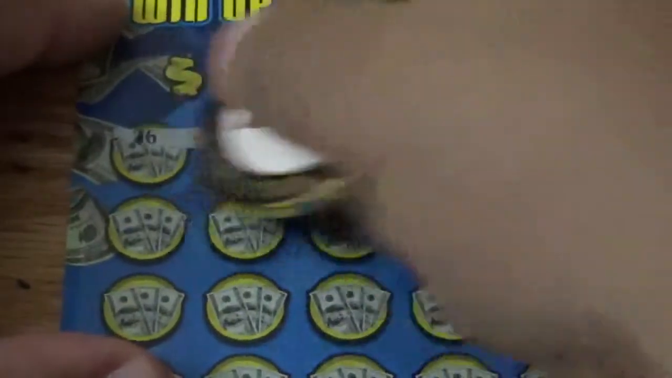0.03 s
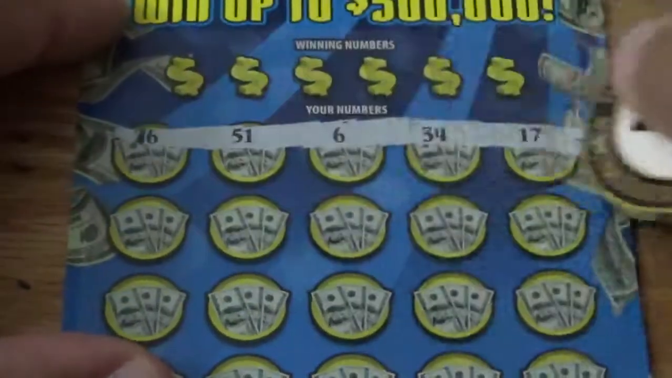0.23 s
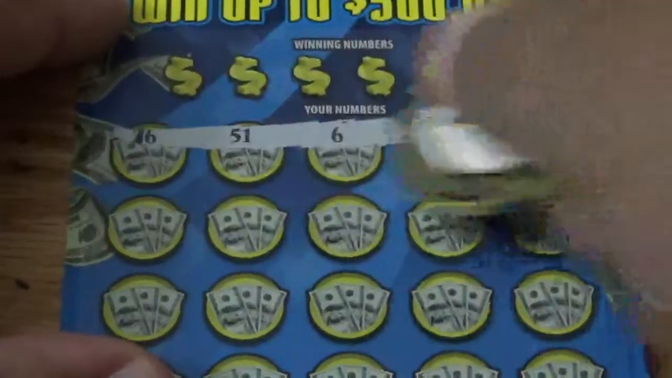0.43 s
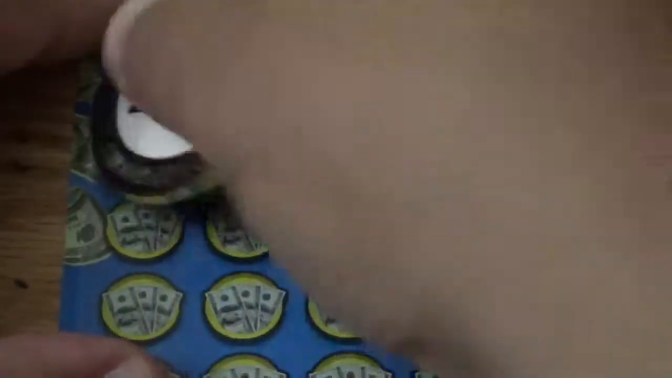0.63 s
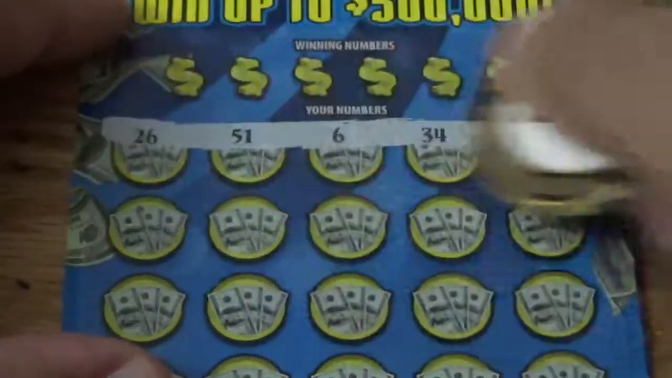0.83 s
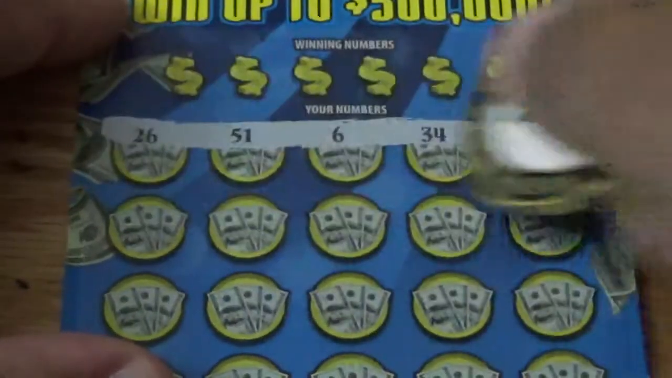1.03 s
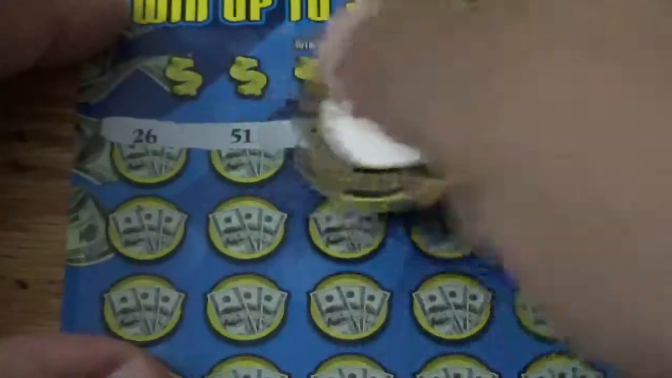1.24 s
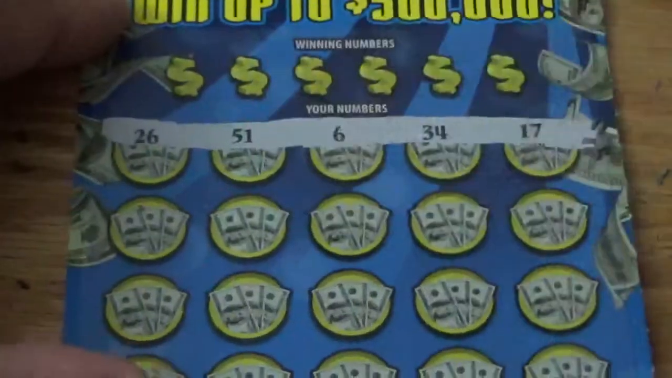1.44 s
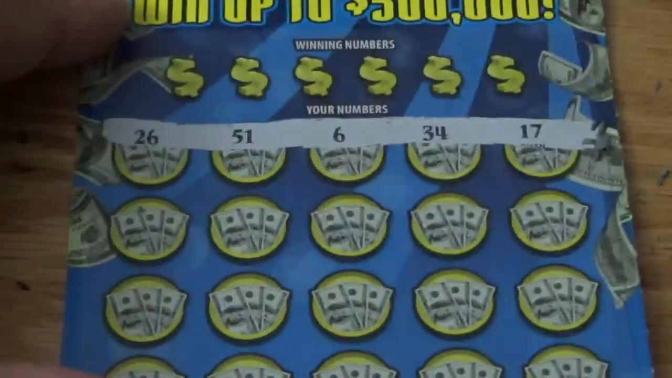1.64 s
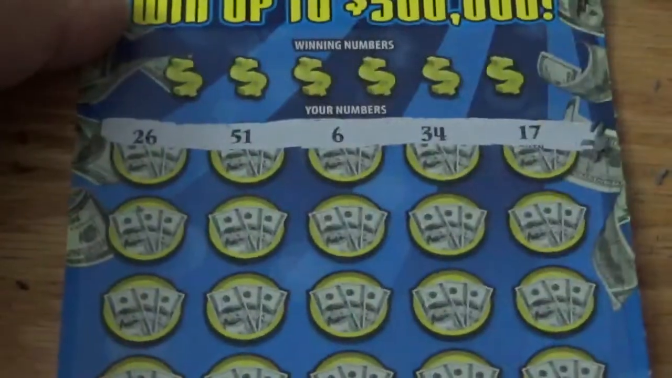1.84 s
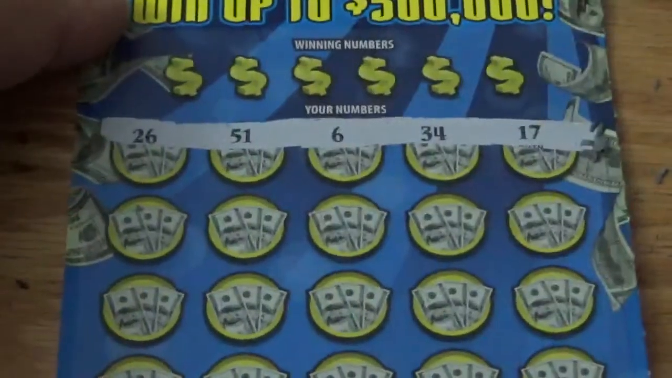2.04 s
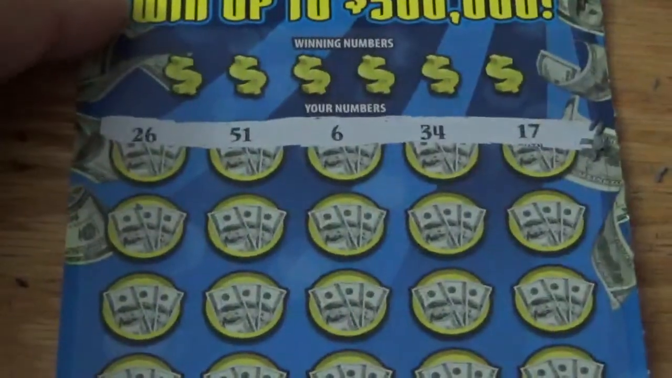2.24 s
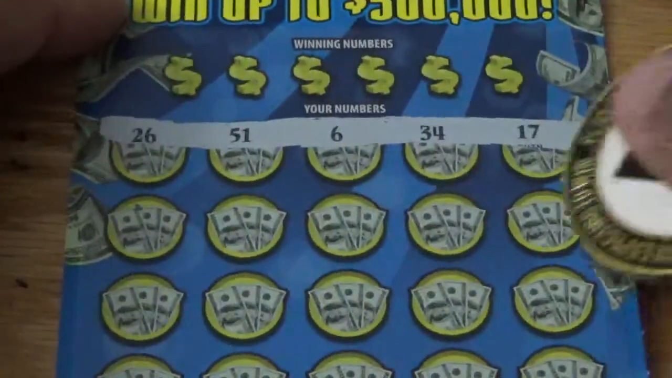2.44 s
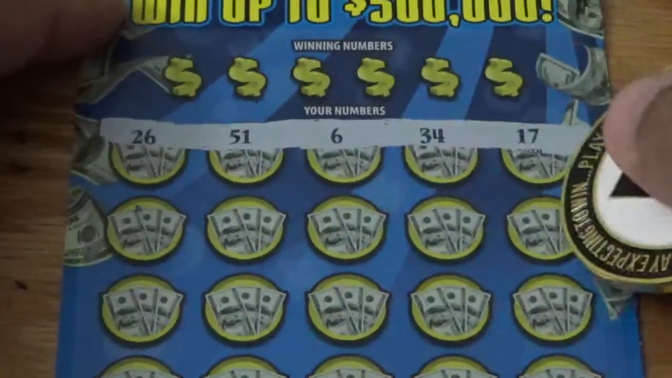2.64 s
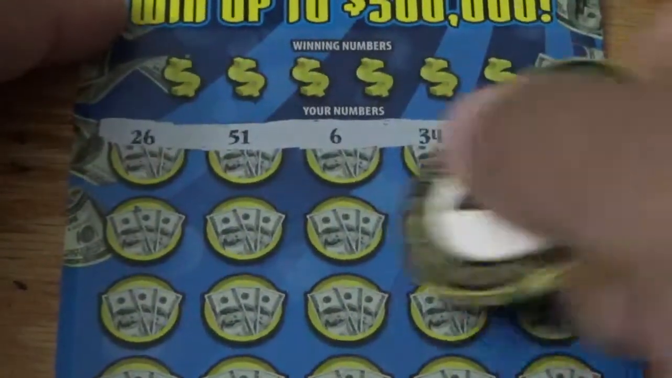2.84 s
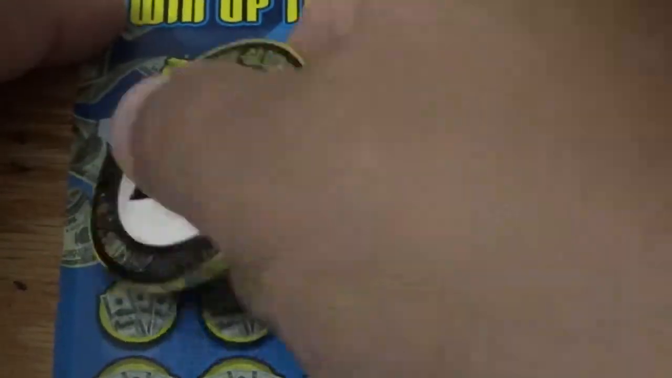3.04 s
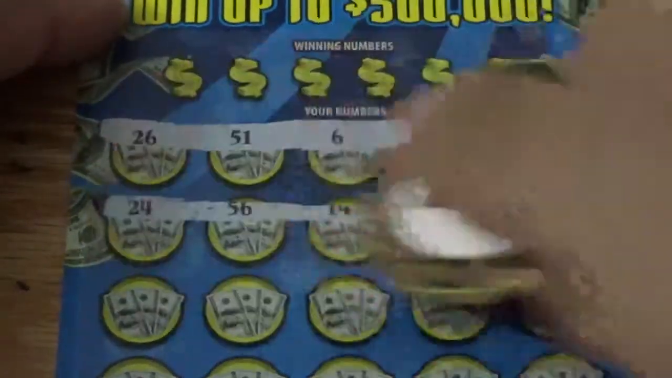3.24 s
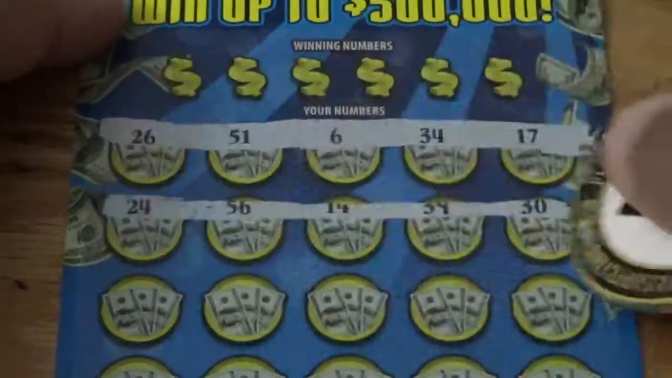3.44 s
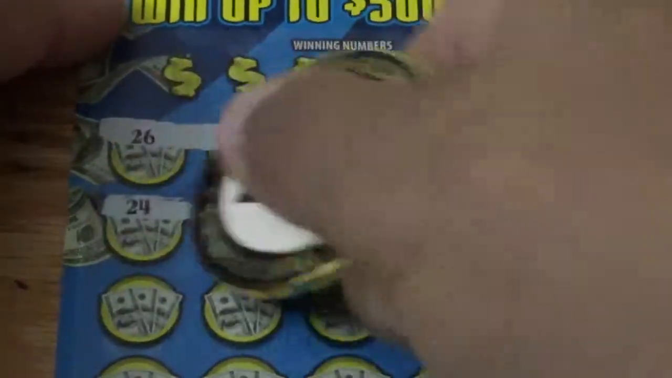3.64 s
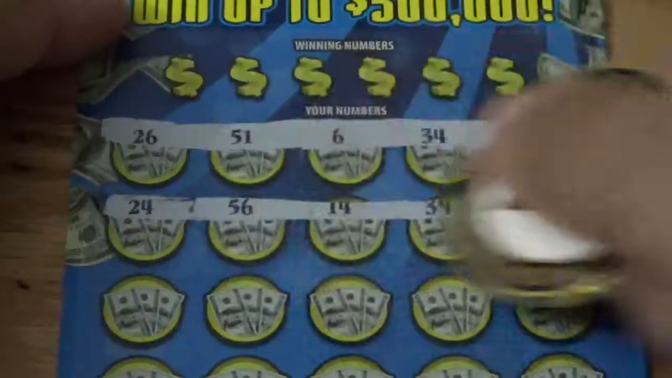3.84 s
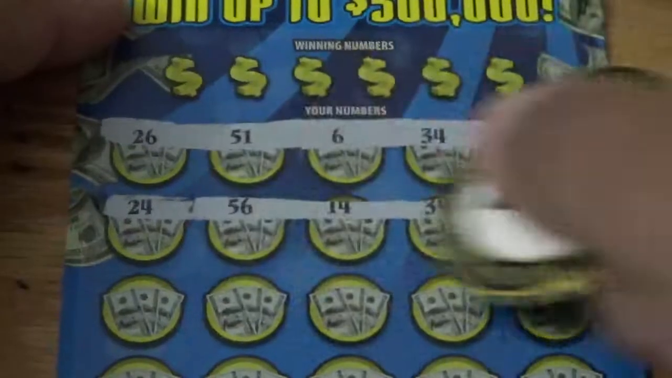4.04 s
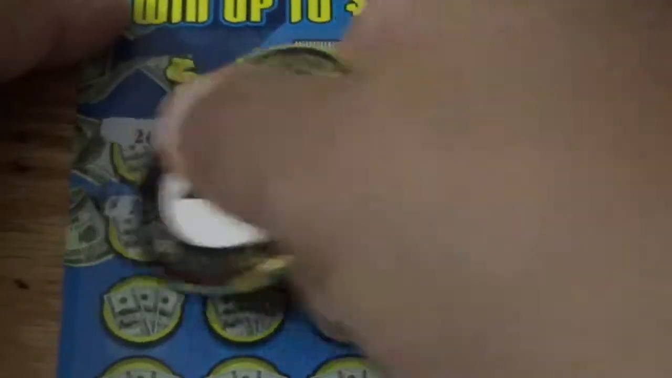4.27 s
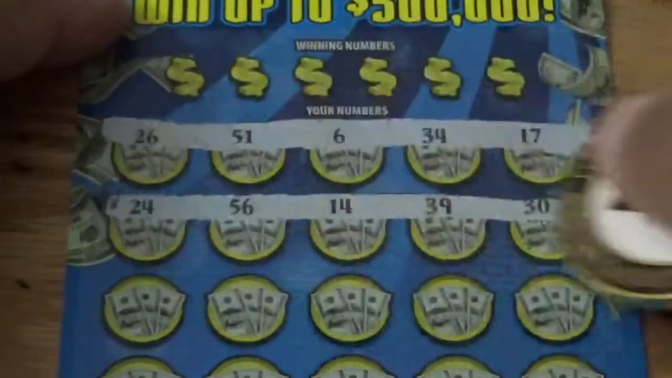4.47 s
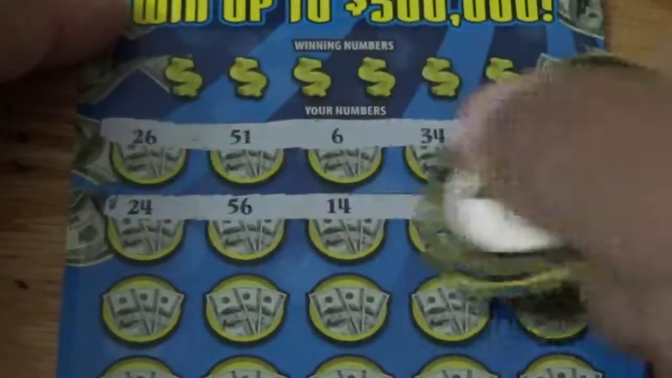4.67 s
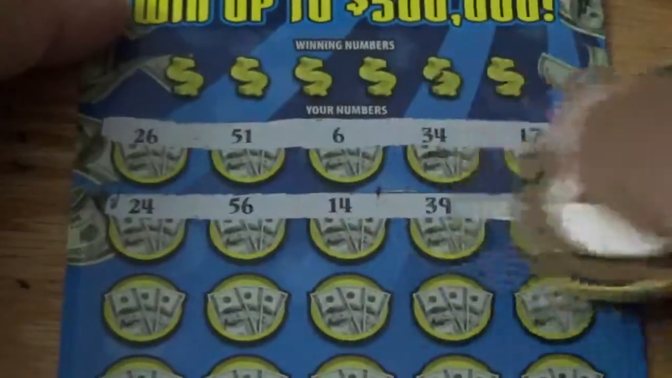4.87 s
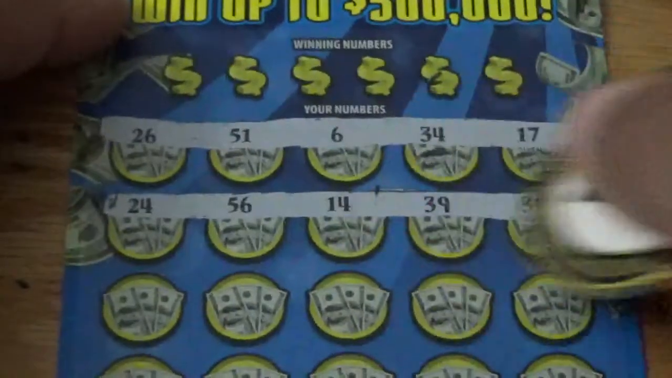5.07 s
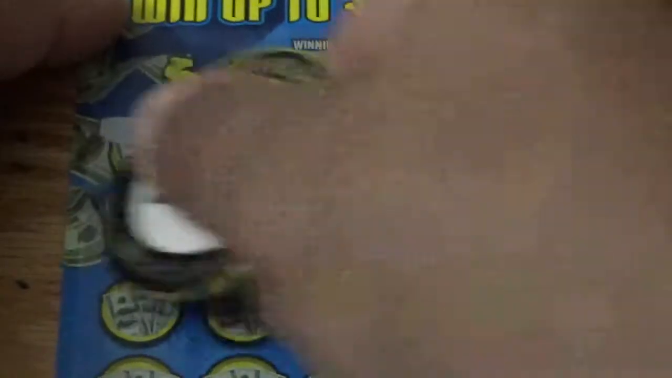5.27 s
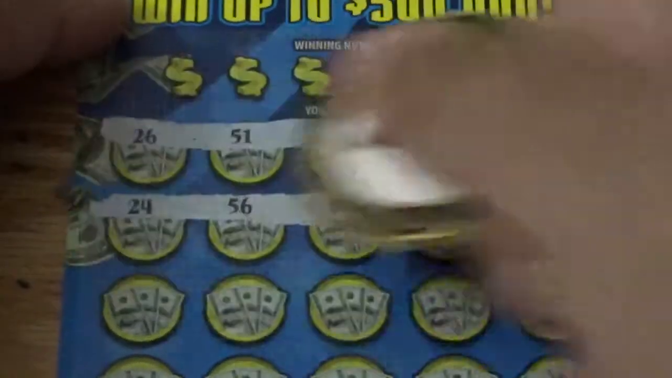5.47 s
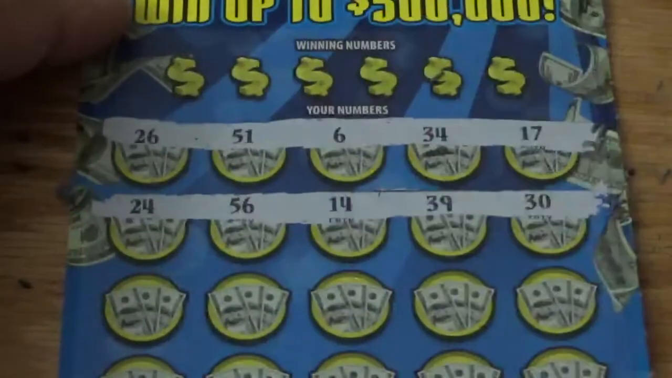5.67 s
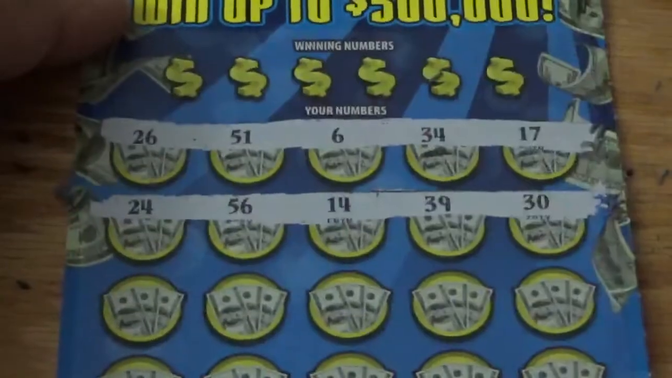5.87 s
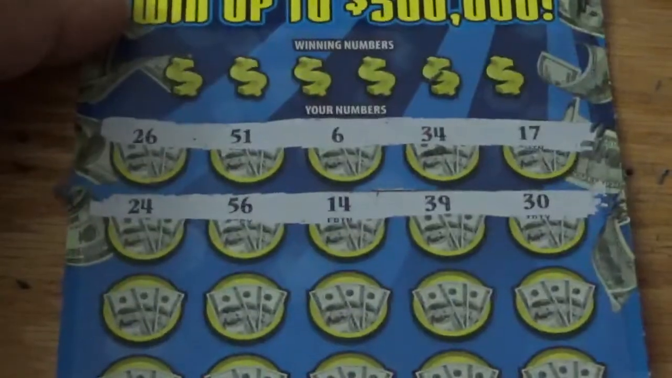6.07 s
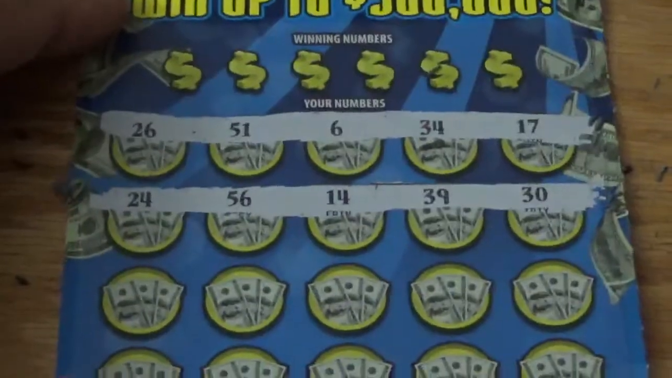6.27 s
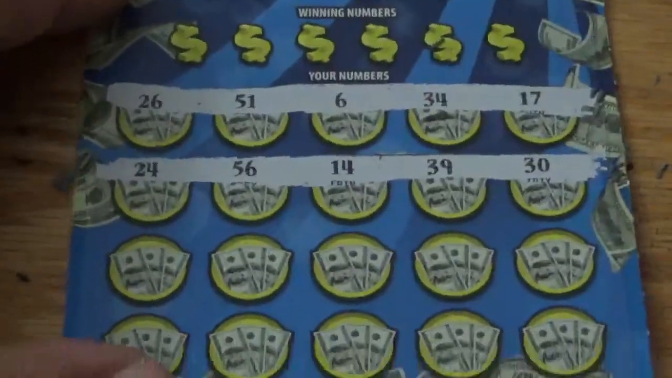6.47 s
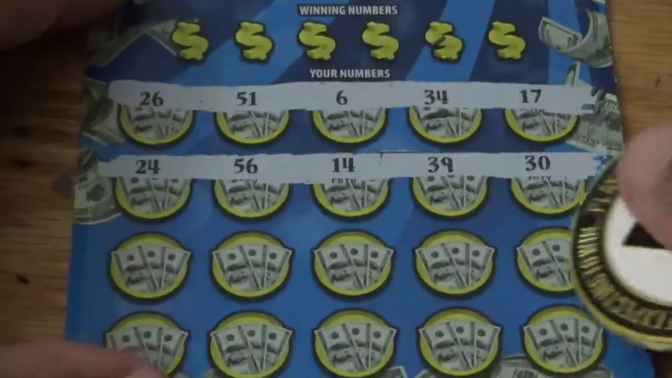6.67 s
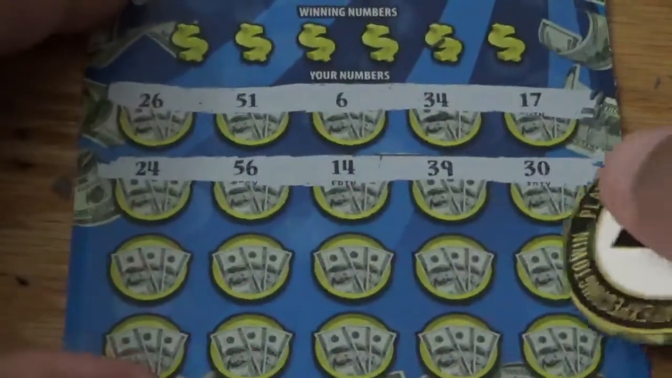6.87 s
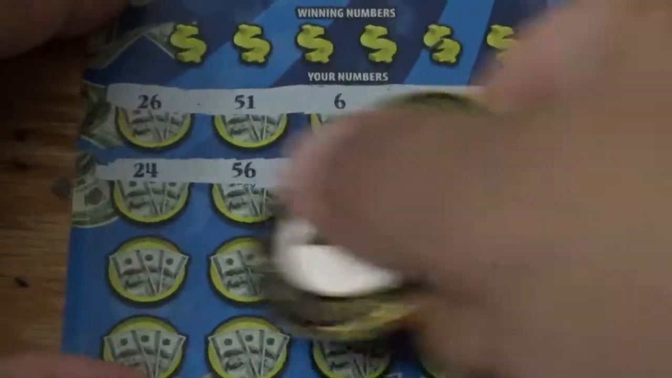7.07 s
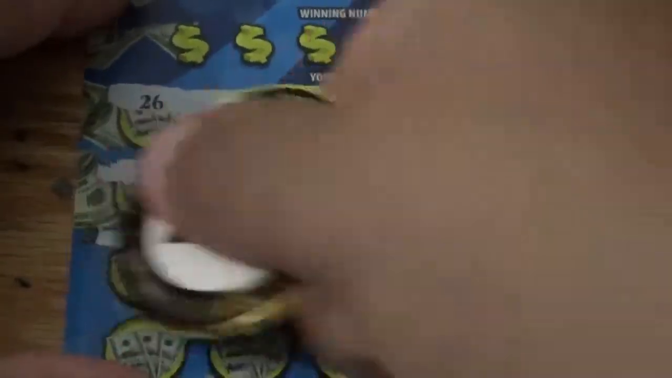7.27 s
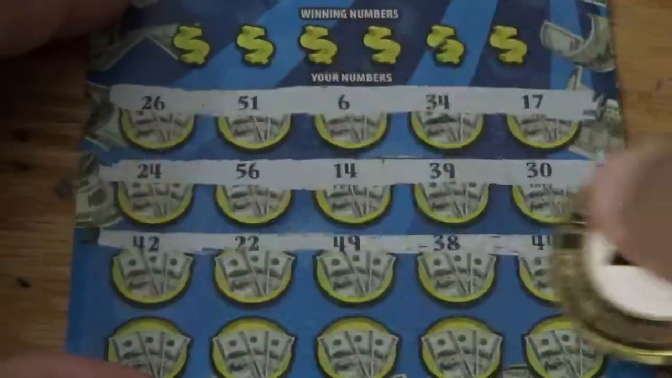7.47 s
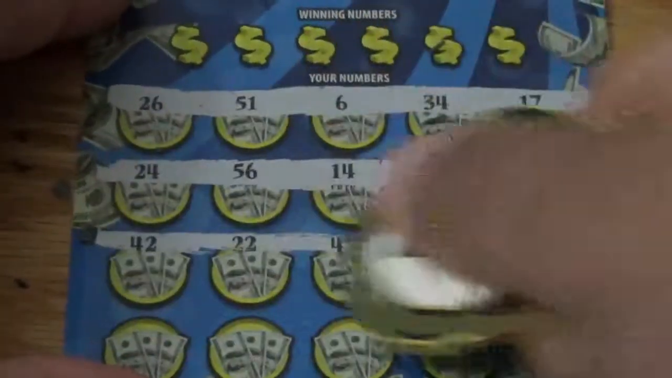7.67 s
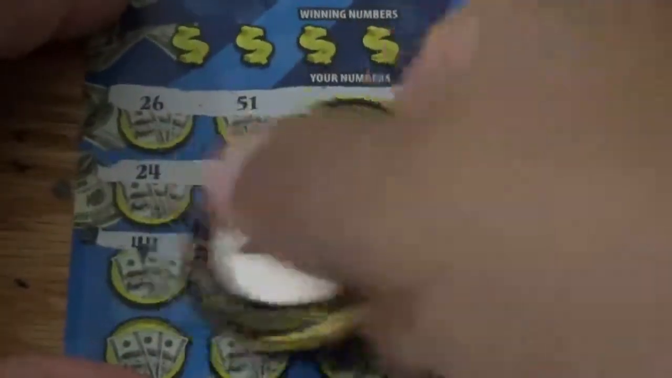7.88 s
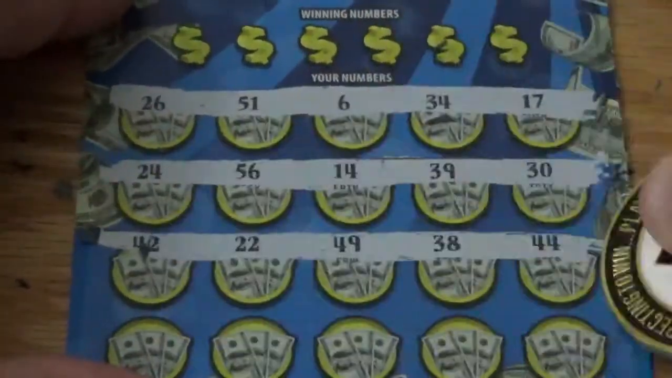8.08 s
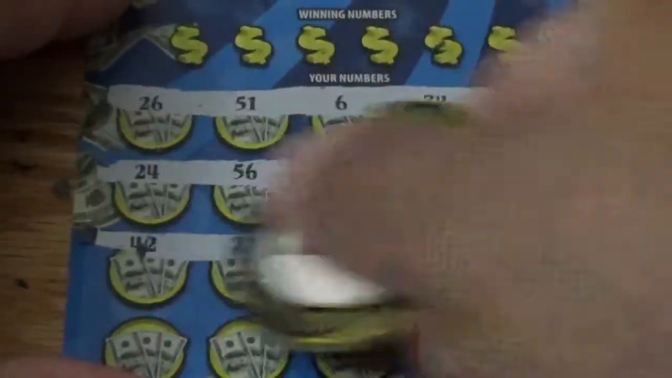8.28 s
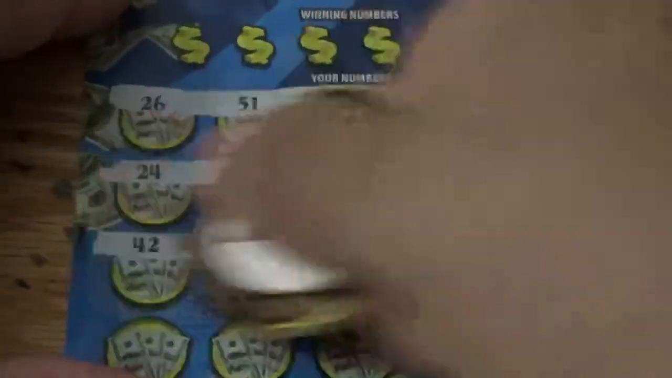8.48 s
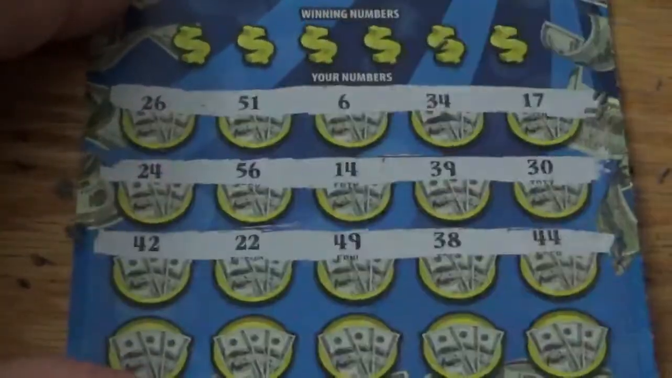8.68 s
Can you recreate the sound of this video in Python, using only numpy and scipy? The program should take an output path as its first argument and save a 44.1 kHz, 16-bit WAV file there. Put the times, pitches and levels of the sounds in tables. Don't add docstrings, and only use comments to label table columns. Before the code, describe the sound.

A thick coin scrapes a card ticket on a wooden table in fast back-and-forth strokes, with pauses of soft palm brushing and small ticks.

```python
import sys
import numpy as np
from scipy import signal
from scipy.fft import rfft, irfft, next_fast_len
from scipy.io import wavfile
from scipy.ndimage import uniform_filter1d

SR = 44100
rng = np.random.default_rng(int(sys.argv[2]) if len(sys.argv) > 2 else 0)


def generate_wav(sig):
    pcm = np.round(np.clip(np.atleast_2d(sig).T, -1, 1) * 32767).astype(np.int16)
    wavfile.write(sys.argv[1], SR, pcm)


def undo_db(level):
    steps = np.asarray(level, float) / 20
    return 10 ** steps


N = 384111


def unit(x):
    return x / np.sqrt(np.mean(x ** 2) + 1e-20)


def along(points, hz):
    f, v = np.transpose(points)
    return np.interp(np.log(hz + 1), np.log(f + 1), v)


def wobble(rate):
    knots = rng.standard_normal(int(N * rate / SR) + 2)
    return np.interp(np.arange(N) * rate / SR, np.arange(len(knots)), knots)


def bumps(rows, t):
    return sum(np.outer(db, np.exp(-((t - s) / half) ** 2)) for s, half, *db in rows)


def filtered(x, response):
    m = next_fast_len(N + SR // 2)
    return irfft(rfft(x, m) * response(np.fft.rfftfreq(m, 1 / SR)), m)[..., :N]


def shape(points):
    return lambda hz: undo_db(along(points, hz))


def modes(peaks, flip=True):
    def response(hz):
        total = 0
        for k, (centre, width, db) in enumerate(peaks):
            sign = -1 if flip and k % 2 else 1
            damping = 1j * hz * width
            total = total + sign * undo_db(db) * damping / (centre * centre - hz * hz + damping)
        return total
    return response


def above(hz, edge_hz):
    s = 1j * hz / edge_hz
    return s * s / (s * s + 1.23 * s + 1)


def driven(force, gain, response, tilt_db=None, split_hz=None):
    def body(hz):
        r = np.interp(hz, hz[::16], response(hz[::16]))
        return r / np.sqrt(np.mean(np.abs(r) ** 2))

    def halves(hz):
        lower = 1 / (1 + (hz / split_hz) ** 12)
        return body(hz) * [lower, 1 - lower]

    if tilt_db is None:
        return filtered(force * gain, body)
    return filtered(force * gain * undo_db([-tilt_db / 2, tilt_db / 2]), halves).sum(0)


def slips(spread_db, clump_db, clump_rate):
    largest = 4
    uneven_db = spread_db * np.minimum(rng.exponential(size=N), largest)
    size = undo_db(uneven_db + clump_db * np.clip(wobble(clump_rate), -2, 2))
    return unit(np.tanh(unit(size * rng.standard_normal(N)) / largest))


def patchy(x, depth_db, hz_bins, frames):
    z = signal.stft(x, nperseg=512)[2]
    field = uniform_filter1d(rng.standard_normal(z.shape), hz_bins, 0)
    field = uniform_filter1d(field, frames, 1)
    return unit(signal.istft(z * undo_db(depth_db * unit(field)), nperseg=512)[1][:N])


# (frequency [Hz], level [dB per Hz])
AIR = [(20, -34), (40, -5), (110, -7), (190, 0), (320, -2), (570, -7.5), (920, -8), (2100, -11),
       (4000, -16), (6500, -19.5), (8000, -19.5), (10500, -19.5), (11300, -25)]
# (frequency [Hz], left-right likeness [0-1])
AIR_ALIKE = [(60, 1), (340, 0.67), (820, 0.059), (2000, 0.24), (4700, 0.51), (11300, 0.73)]


def air():
    def mid_side(hz):
        turn = np.arccos(np.clip(along(AIR_ALIKE, hz), -1, 1)) / 2
        return shape(AIR)(hz) * [np.cos(turn), np.sin(turn)]

    mid, side = filtered(rng.standard_normal((2, N)), mid_side)
    return undo_db(-56 + wobble(2.45)) * unit(np.array([mid + side, mid - side]))


# (time [s], half-length [s], level [dB])
SHAKES = [(.3, .06, 5), (.6, 0.17, 4.5), (1.0, 0.083, 7), (1.7, 0.067, 6), (2.2, 0.44, -7),
          (6.5, 0.47, -10), (3.95, .15, 1), (4.9, 0.09, 4), (8.05, .08, 4), (3.3, 0.044, -4),
          (3.72, .07, 4), (4.2, .05, 0), (4.65, 0.062, 6), (5.09, .06, 11), (5.5, .06, 2), (7.5, 0.12, 7),
          (8.3, 0.21, 6), (8.6, 0.2, 5)]
# (frequency [Hz], level [dB per Hz])
SHAKE = [(20, -20), (40, -4), (80, -2.5), (150, -0.5), (230, -20), (400, -70)]
# (time [s], half-length [s], level [dB], pitch [Hz])
WHINE = [(2.1, .3, -68, 7950), (6.0, .22, -74, 7950), (2.32, 0.15, -61, 4680), (1.44, .03, -52, 4700),
         (5.46, .035, -42, 6500), (5.2, 0.083, -58, 4700), (6.29, 0.066, -57, 950),
         (2.4, 0.034, -52.5, 370)]


def rumble():
    t = np.arange(N) / SR
    push = rng.standard_normal(N)
    ports = push + np.outer([.25, -.25], push[::-1])
    strength = undo_db(-69.5 + bumps(SHAKES, t[::64])[0]).repeat(64)[:N]
    shake = driven(ports, strength, shape(SHAKE))
    whine = 0
    for s, half, db, hz in WHINE:
        whine = whine + undo_db(db) * np.exp(-((t - s) / half) ** 4) * np.sin(2 * np.pi * hz * t)
    return undo_db(1.5) * shake + whine * wobble(140)


# (frequency [Hz], level [dB])
WET = [(100, -35), (350, -9), (700, 3), (1200, -0.5), (2200, 4), (3000, 5), (6000, 0.5), (10000, 6.5)]
# (frequency [Hz], t60 [s])
ROOM = [(200, 0.068), (1000, 0.23), (3000, 0.23), (6000, 0.17), (10000, 0.058)]


def room(x):
    hz, t, z = signal.stft(rng.standard_normal((2, SR // 3)), SR, nperseg=128)
    decay_db = -60 * t / along(ROOM, hz)[:, None]
    tail = signal.istft(z * undo_db(decay_db + along(WET, hz)[:, None]), SR, nperseg=128)[1]
    return signal.fftconvolve(x[None], tail / np.linalg.norm(tail[0]), axes=1)[:, :N]


# (time [s], rise [s], fade [s], hiss level [dB], rub level [dB], brightness [dB])
PALM = [(1.36, 0.039, 0.34, -43, -61, 5.5), (2.17, 0.09, 0.3, -53, -63, -3),
        (5.389, 0.062, 0.11, -34.5, -75, 7.5), (5.5, 0.042, 0.29, -36, -60.5, 12),
        (6.21, 0.036, 0.15, -61.5, -58, -6), (6.27, 0.099, 0.85, -54, -84, -3),
        (8.58, 0.024, 0.29, -33, -56, 11)]


def slides():
    t = np.arange(0, N, 32) / SR
    start, rise, fade, hiss_db, rub_db, bright_db = np.transpose(PALM)
    ramps = [np.interp(t, [s, s + r, s + r + f], [0, 1, 0]) for s, r, f in zip(start, rise, fade)]
    swell = np.sin(np.pi / 2 * np.array(ramps))
    hiss = undo_db(hiss_db) @ swell ** 2.8
    rub = undo_db(rub_db) @ swell ** 0.71
    bright = (undo_db(hiss_db) * bright_db) @ swell ** 4.5 / (hiss + 1e-9)
    return [np.interp(np.arange(N) / SR, t, curve) for curve in (hiss, rub, bright)]


# (frequency [Hz], level [dB per Hz])
SKIN = [(500, -25), (1500, -11.5), (2500, -14), (4300, -8.5), (4700, -6), (5100, -7.5), (7500, 0.5),
        (9200, -3), (11000, -13)]
# (frequency [Hz], level [dB per Hz])
RUB = [(150, -59), (300, 7), (1000, 2), (2500, -12), (4000, -24)]


def palm():
    hiss, rub, bright_db = slides()
    force = patchy(slips(spread_db=0.8, clump_db=1.0, clump_rate=56), 2.2, hz_bins=10, frames=9)
    fine = driven(force, hiss, shape(SKIN), bright_db, split_hz=9700)
    return fine + undo_db(-1.0) * driven(force[::-1], rub, shape(RUB))


# (time [s], peak level [dB], centre [Hz], scuff share [0-1])
TICKS = [(0.3147, -20, 4940, 0.13), (0.9655, -27, 5500, 0.2), (.989, -27, 7500, .3), (4.6, -29, 9000, .3),
         (4.821, -26, 7500, .5), (2.0134, -49, 7330, 0.13), (2.0502, -42, 7150, 0.33),
         (2.1414, -31.5, 9880, 0.06), (2.177, -24.5, 7940, 0.03), (2.518, -31, 6900, 0.25),
         (2.5491, -43, 5550, 0), (2.5826, -6, 7400, 0.08), (2.681, -32.5, 6000, 0.18),
         (2.7313, -36.5, 9050, 0.19), (3.4247, -29, 5500, 0.4), (4.564, -35, 7000, 0.5),
         (4.89, -24, 9800, 0.2), (3.885, -24, 10000, .2), (3.24, -13, 5600, .8), (3.274, -15, 5600, .9),
         (2.693, -46, 2500, .4), (5.046, -24, 7000, 0.9), (5.056, -2.5, 9000, 0.07),
         (5.056, -18, 3600, 0.3), (2.5824, -31.5, 2810, 0.15), (6.7625, -29, 3000, 0.14),
         (5.068, -17, 9000, 0.3), (5.071, -16, 5500, 0.9), (5.0768, -14.5, 4400, 0.6),
         (5.077, -16, 9000, .6), (5.378, -37, 9300, .2), (6.2292, -39, 6560, 0.2), (6.355, -36, 7250, 0.2),
         (6.356, -42, 1800, .3), (6.764, -18, 6460, 0.07), (6.771, -34, 5800, .6), (6.482, -44, 2500, .2),
         (6.8017, -42, 7900, 0.1), (6.8444, -46, 3700, 0.1), (7.23, -18, 2275, 0.3),
         (7.5227, -11, 10500, 0.08), (8.072, -6.5, 10500, 0.5), (8.0771, -10, 6000, 0.24),
         (8.1764, -17, 5460, 0.4), (8.241, -26, 9500, 0.06), (8.254, -25, 9500, .1), (8.59, -9, 8000, 0.35)]
# (time [s], peak level [dB], centre [Hz], scuff share [ratio])
SKIDS = [(0.353, -25, 5730, 0.9), (1.321, -25, 8250, 0.9), (1.3438, -10, 7800, 0.8),
         (4.506, -19.5, 6100, 0.9), (8.149, -26, 6500, 1.5), (8.163, -25, 6400, 1.5)]


def ticks():
    out, t = np.zeros(N + SR), np.arange(SR // 10) / SR
    card = signal.butter(1, [1600, 3400], "band", fs=SR, output="sos")
    for rows, scuff_t60_s in [(TICKS, 0.019), (SKIDS, 0.059)]:
        for s, db, hz, scuff in rows:
            decay = 0.04 * undo_db(-60 * t / 0.0062) + scuff * undo_db(-60 * t / scuff_t60_s)
            burst = rng.standard_normal(len(t)) * decay
            burst[0] = 1
            colour = signal.butter(2, [hz * 0.55, min(hz * 1.31, 14000)], "band", fs=SR, output="sos")
            burst = signal.sosfilt(colour, burst) + 0.1 * signal.sosfilt(card, burst)
            out[round(s * SR):][:len(t)] += undo_db(db - 6.0) * burst / np.abs(burst).max()
    return out[:N]


# (frequency [Hz], width [Hz], level [dB])
TABLE = [(193.7, 22.3, 4.5), (316.9, 8.8, 5), (341, 35, -1.5), (429.6, 30, -6.5), (495.2, 24, -2.5),
         (580.4, 17.7, 1), (635.7, 22, -1.5), (724, 35, -1)]


def top(hz):
    return modes(TABLE, flip=False)(hz) * above(hz, 302.4) ** 3 / (1 + 1j * hz / 900)


# (time [s], peak level [dB], hardness [Hz])
KNOCKS = [(0.23, -17, 470), (0.29, -2.5, 225), (0.33, -7, 260), (0.99, -14, 350), (2.395, -38, 220),
          (4.59, -19, 340), (9.4, -17, 340), (8.585, -10.5, 330), (4.527, -18, 320), (5.057, -8, 350),
          (5.121, -25, 540), (6.352, -17, 225), (1.994, -24, 270), (6.813, -13, 420), (6.811, -28.5, 800),
          (7.1, -42, 730), (6.34, -36, 440), (5.047, -16, 280), (7.227, -25, 2500)]
# (frequency [Hz], width [Hz], level [dB])
CARD = [(811, 72, 0.5), (876.6, 13.7, 9.5), (938.4, 40, 6.5), (1037, 81, 4), (1135, 65, 7),
        (1230.4, 30.3, 9.5), (1284, 55, 3.5), (1414, 55, -0.5), (1539, 41, 4), (1633, 47, 1.5),
        (1820, 37, -3.5)]


def knocks():
    blows, t = np.zeros(N + SR), np.arange(SR // 50) / SR
    for s, db, hz in KNOCKS:
        push = t ** 3 * np.exp(-2 * np.pi * 1.045 * hz * t)
        blows[round(s * SR):][:len(t)] += undo_db(db + 40.5) * push / push.sum()
    return filtered(blows[:N], lambda hz: top(hz) + 0.84 * modes(CARD)(hz) * above(hz, 1100))


def speed_of(t, start, length, fastest, rest_db):
    cruise = 0.77
    skew = np.log(.5) / np.log(np.clip(fastest, .1, .9))
    along_stroke = np.clip((t - start) / length, 0, 1) ** skew
    creep = undo_db(rest_db) * (np.abs(t - start - length / 2) < length / 2 + .04)
    return np.tanh((np.abs(np.sin(np.pi * along_stroke)) + creep) / cruise)


# (time [s], jolt of the edge [dB], jolt of the card [dB])
SNAGS = [(.022, -6, 2), (0.045, -8, 6), (.143, 4, 4), (.166, 2, 1.5), (.356, 14, -6), (.696, 2, -0.5),
         (.706, 2, 0), (.773, 10.5, -1), (0.867, 2, 3.5), (1.237, 3, 0.5), (1.312, -1, 0.5),
         (3.125, -8, 7.5), (3.151, 0, 4.5), (3.24, 5, -3), (3.274, 10, 0), (3.755, 6, -1), (3.845, 7, -0.5),
         (3.999, 7, -5), (4.082, 0, 1), (4.1, 1, -0.5), (4.364, 3, 0), (4.818, 16, -0.5), (4.936, 0, 4.5),
         (5.122, 5, 4.5), (5.146, 0, 2), (5.158, 5, 4), (6.902, -18, 11), (6.93, 12, 0), (7.287, -18, 3),
         (7.304, -2, 3), (7.332, -4, 5.5), (7.456, 7, -3), (7.51, -7, 4), (7.874, 4, 0.5), (7.887, 9, 3),
         (7.907, 0.5, 8), (7.98, 7, 2), (8.056, 5, 3), (8.211, 1, 12.5), (8.251, -5, 5.5), (8.462, 7, 1),
         (8.493, -4, 4.5), (8.514, 6, 1.5)]


def snags(t):
    rise_s, fade_s = 0.0017, 0.0065
    jolts = 0
    for s, *db in SNAGS:
        after = t - s - rise_s
        jolts = jolts + np.outer(db, np.exp(-np.abs(after) / np.where(after > 0, fade_s, rise_s)))
    return jolts


# (from [s], to [s], tearing level [dB])
CUTS = [(0, 0.046, -1.5), (0.272, 0.308, -17), (0.937, .96, -8), (1.313, 1.356, 8), (3.38, 3.42, -8),
        (3.618, 3.66, -6), (3.89, 3.94, -6), (4.47, 4.503, -2), (5.157, 5.237, 3), (5.33, 5.37, -3),
        (6.877, 6.93, -10), (7.215, 7.25, -10), (7.53, 7.57, -5), (8.095, 8.145, -8), (8.182, 8.238, -8),
        (8.385, 8.427, -1)]


def cuts(t):
    step_s = .003
    return sum(db / 2 * (np.tanh((t - a) / step_s) - np.tanh((t - b) / step_s)) for a, b, db in CUTS)


# (time [s], length [s], force [dB], weight on the table [dB], bite of the edge [dB])
STROKES = [(.004, 0.3, -24.5, -11, -17.5), (0.338, 0.32, -23.5, -3, -13.5), (0.663, 0.3, -25, -12, -7.5),
           (0.985, 0.21, -25, 2, -14), (1.212, 0.17, -29, -8, -8.5), (2.709, 0.4, -33, -8, -6.5),
           (3.096, 0.32, -25, -18, -8), (3.446, 0.26, -29, -1, -4), (3.715, 0.23, -26, -13, -11),
           (3.975, 0.28, -27.5, -1.5, -6.5), (4.265, 0.23, -26, -19, -5), (4.488, 0.059, -33, -17, -5),
           (4.56, 0.22, -34.5, 2, -6.5), (4.799, 0.19, -31.5, -1.5, -1), (5.029, 0.35, -30.5, 0, -5),
           (6.903, 0.36, -26, -12.5, -4), (7.261, 0.3, -23, -19.5, -5.5), (7.569, 0.27, -23.5, -16.5, -7),
           (7.845, 0.29, -25.5, -16.5, -6.5), (8.109, 0.31, -27.5, -5.5, -4),
           (8.435, 0.18, -26.5, -12.5, -11.5), (6.81, 0.046, -57.5, 17, -15.5)]
# (freedom to ring [dB], flex of the card under it [dB])
HOLDS = [(-4, 1.5), (-8.5, -3.5), (-1, 1.5), (-1.5, -3.5), (3, 1.5), (-7.5, -6.5), (5.5, -2.5),
         (-8.5, -2.5), (3.5, 3), (-6, -1.5), (3.5, 0.5), (1, 1), (-2, -2), (0.5, 3.5), (-3.5, -5.5),
         (-1.5, -1.5), (4, -3), (-1, -0.5), (4, 3), (-4, 2.1), (-3, -3.5), (-.4, 4)]
# (share passed before top speed [0-1], rocking of the coin in the grip [dB])
SWINGS = [(0.54, 0), (0.5, 0.5), (0.49, -1.5), (0.48, 1.5), (0.45, -1), (0.49, -0.5), (0.53, -1), (0.43, 2),
          (0.54, 0), (0.45, 0.5), (0.57, -2.2), (0.27, 1), (0.49, 1), (0.5, 1.5), (0.5, 1), (0.51, -2),
          (0.52, -2.5), (0.52, 0.5), (0.54, -0.5), (0.58, 1), (0.56, 1), (0.26, -1)]
# (table [dB], card [dB], coin [dB], coating [dB])
TONES = [(.1, 2, 14, 0.5), (3, -1, -13, -5.5), (.1, 0, 12.5, 1.5), (.1, 4, -4, -6), (.1, 7, 13, -4),
         (.1, 3, -6, -4), (.1, 2, -2, 1.5), (.1, -1.5, -8, -2.5), (.1, 5, -8, -1), (.1, 0, -8, -2.5),
         (.1, 2, -4, 2.5), (.1, -3, -3, 3), (.1, -2, -3, -7.5), (.1, -4, -2, -3.5), (.1, 0, -8, 0.5),
         (.1, 1.5, 5, -4), (.1, -2.5, 4, -1), (.1, 0, 1, -5), (.1, -4.5, -1, 4), (.1, -2, -4, 1.5),
         (.1, -2, -4, 2.5), (.1, .1, .1, .1)]
# (drift of table tone [dB], drift of card tone [dB], ring of the rim [dB])
DRIFTS = [(.1, 5, 1), (2, -6, -2), (.1, .1, -6), (.1, -1, 1), (.1, 9, 5.5), (.1, 2, 1.5), (.1, -2, 0),
          (.1, -5, 1), (.1, 6, 5.5), (.1, -3, 1), (.1, 6, 3.5), (.1, 11, -2), (.1, -9, 3.5), (.1, 7, -1),
          (.1, -4, 1.5), (.1, -3, 2), (.1, 2, -6), (.1, -2, 2.5), (.1, 2, 0), (.1, -4, -8), (.1, 4, -4),
          (.1, .1, -4)]
# (time [s], half-length [s], bite [dB], force [dB])
CATCHES = [(0.16, 0.24, 15.5, 2), (0.57, 0.078, 2.5, 0.5), (0.716, 0.033, -3.5, 7), (0.77, 0.028, 3.5, 1.5),
           (0.828, 0.03, -8.5, -3), (.9, 0.037, 6.5, 0), (1.115, 0.06, 4, -1), (8.59, 0.048, 23, -12),
           (2.923, 0.19, 5, 4.5), (3.36, 0.022, 3.5, 5.5), (3.603, 0.038, -1.5, 2), (3.85, 0.015, 2.5, 2.5),
           (4.071, 0.011, -6, -0.5), (4.11, 0.015, 4, 1.5), (4.317, 0.049, -10, 4), (4.43, 0.044, 3, 3),
           (4.67, 0.036, 3, 6), (4.867, 0.036, -15, 3), (4.94, 0.043, 4, -3), (5.127, 0.033, -11, 6.5),
           (5.188, 0.029, 7.5, -1.5), (5.28, 0.045, -5, 1.5), (5.319, 0.008, 9.5, 0),
           (7.498, 0.032, -3.5, 4.5), (7.67, 0.035, 6, -2.5), (7.75, 0.0081, 6, -8.5),
           (7.955, 0.0078, -6, -1), (8.209, 0.019, -16, -2), (8.291, 0.0076, 13, -7.5),
           (8.524, 0.017, 10, 2.5)]
# (time [s], half-length [s], weight [dB])
LEANS = [(.1, 0.062, 1.5), (.2, 0.026, -9), (.262, 0.011, -1), (.54, 0.053, 4.5), (.76, 0.04, -2),
         (.825, 0.019, 8), (1.03, 0.04, 0), (1.36, 0.073, 9), (2.765, 0.024, 12.5), (3.04, 0.036, 9),
         (3.15, 0.046, 9), (3.38, 0.011, 12), (3.79, 0.038, 4), (3.99, 0.052, -6), (4.36, 0.05, 14),
         (4.825, 0.018, 0), (5.075, .025, 4.5), (5.26, 0.11, -0.5), (6.94, 0.053, 8), (7.37, 0.026, -4),
         (7.58, 0.053, 5), (7.65, 0.021, 7.5), (7.75, .03, 1), (7.82, 0.044, 9.5), (8.12, 0.021, 6),
         (8.61, 0.089, 17)]


def hand():
    table_grows, card_grows, coin_grows, rasp_grows = 1, 1.58, 3.52, 2.15
    lands_s, lifts_s = 0.0067, 0.0066
    t = np.arange(0, N, 32) / SR
    (dig_db, push_db), (lean_db,) = bumps(CATCHES, t), bumps(LEANS, t)
    jolts, cut_db = snags(t), cuts(t)
    dig_db, push_db = dig_db + jolts[0], push_db + jolts[1]
    gains, tilt_db = np.zeros((6, len(t))), np.zeros((5, len(t)))
    for stroke, hold, swing, tone, drift in zip(STROKES, HOLDS, SWINGS, TONES, DRIFTS):
        start, length, force_db, weight_db, bite_db = stroke
        free_db, flex_db = hold
        fastest, rock_db = swing
        now = (t > start) & (t < start + length)
        across = 2 * (t[now] - start) / length - 1
        tilt_db[:, now] = np.c_[[*tone, drift[2]]] + np.c_[[*drift[:2], 0, 0, 0]] * across

        speed = speed_of(t, start, length, fastest, rest_db=-22.5)
        edge = speed_of(t, start + lands_s, length - lands_s - lifts_s, fastest, rest_db=-14)
        force, bite = force_db + push_db, bite_db + dig_db
        landing_db = -weight_db / 10 * 3.5 * np.exp(-np.abs(t - start) / 0.039)
        weight = weight_db + lean_db + landing_db

        table = undo_db(force + weight) * speed ** table_grows
        low = undo_db(force + 0.49 * weight + 3.5 + flex_db) * speed ** card_grows
        card = undo_db(force) * speed ** card_grows
        coin = undo_db(force + free_db) * (undo_db(bite) * edge ** coin_grows + undo_db(-22) * speed)
        tear_db = force + 0.92 * bite - 5.5 - 0.31 * jolts[0] + cut_db
        rasp = undo_db(tear_db) * edge ** rasp_grows
        gains = np.maximum(gains, [table, low, card, coin, rasp, undo_db(rock_db) * speed])
    return [np.interp(np.arange(N) / SR, t, curve) for curve in [*gains, *tilt_db]]


# (frequency [Hz], width [Hz], level [dB])
COIN = [(4140, 120, -9), (5781, 120, 8), (5960, 140, 3), (6170, 200, -2.5), (7150, 200, -8)]
# (frequency [Hz], width [Hz], level [dB])
GRIP = [(1935, 32, -6), (2187, 66, 4.5), (2640, 690, -11.5), (2970, 460, -6.5)]
# (frequency [Hz], width [Hz], level [dB])
RIM = [(7250, 140, -9), (8520, 650, 5), (9000, 250, -2)]
# (frequency [Hz], level [dB per Hz])
RASP = [(1400, -25), (2400, -8), (4140, -5.5), (4800, -8), (5800, -5.5), (6560, -4), (7800, -5.5),
        (8700, -6), (9600, -9), (11000, -17)]


def scraping():
    table, low, card, coin, rasp, loose, table_tilt, card_tilt, coin_tilt, rasp_tilt, rim_db = hand()
    contact = slips(spread_db=1.36, clump_db=1.5, clump_rate=160) * undo_db(2.2 * np.clip(wobble(35), -2, 2))

    def force(depth_db, hz_bins):
        own = slips(spread_db=2.5, clump_db=2.0, clump_rate=79)
        return patchy(contact + 1.41 * own, depth_db, hz_bins, frames=14)

    def passed(response, edge_hz):
        return lambda hz: response(hz) * above(hz, edge_hz)

    edge, press, torn = force(1.1, 4), force(1.67, 2), force(2.9, 9)
    rocking = loose * card ** 0.56 * coin ** 0.41
    drone = undo_db(-1.96) * driven(press, table, top, table_tilt, split_hz=400)
    body = undo_db(-4.5) * driven(press, card, passed(modes(CARD[3:]), 970), card_tilt, split_hz=1440)
    body = body - undo_db(-5.5) * driven(press, low, passed(modes(CARD[:3]), 600))
    ring = undo_db(-0.46) * driven(edge, coin, passed(modes(COIN), 2400), coin_tilt, split_hz=5980)
    rock = undo_db(-5.0) * driven(edge, rocking, passed(modes(GRIP), 1150))
    tear = undo_db(3.5) * driven(torn, rasp, passed(shape(RASP), 970), rasp_tilt, split_hz=6000)
    rim = undo_db(-4.5) * driven(edge, rasp * undo_db(rim_db), passed(modes(RIM), 4900))
    return drone + body + ring + rock + tear + rim


def scene():
    background = air() + rumble()
    skin, grit = palm(), ticks()
    near = knocks() + scraping()
    direct = (near + grit) * undo_db([[.05], [-.05]]) + skin * undo_db([[-.5], [.5]])
    return background + undo_db(-10.5) * room(near + 1.16 * skin + .5 * grit) + direct


def top_cut(x):
    return signal.sosfilt(signal.butter(12, 11860, fs=SR, output="sos"), x)


# (frequency [Hz], left over right [dB])
PORTS = [(250, -0.2), (600, -0.1), (1200, 1.2), (2500, 0.3), (5500, 0), (9000, 0.2), (12000, -2)]


def record(dry):
    def microphone(hz):
        band = np.clip(1 - (hz - 11000) / 90, .005, 1)
        return band * undo_db(np.outer([.5, -.5], along(PORTS, hz)))

    return top_cut(filtered(dry, microphone))


dry = scene()
out = record(dry)
generate_wav(out)
```